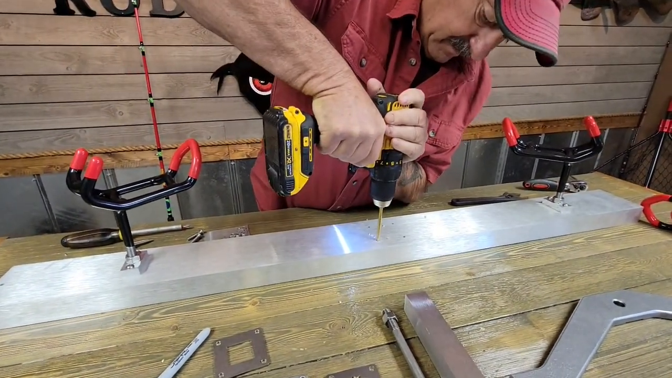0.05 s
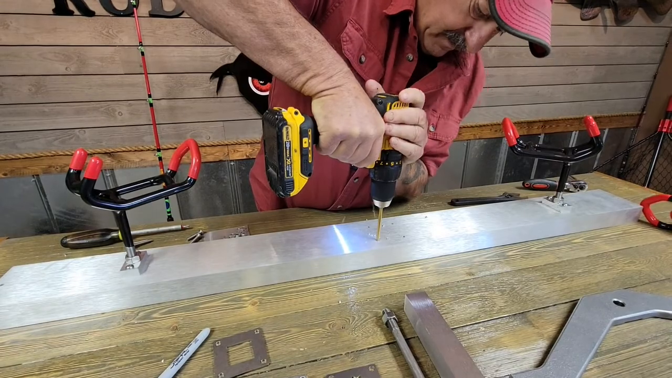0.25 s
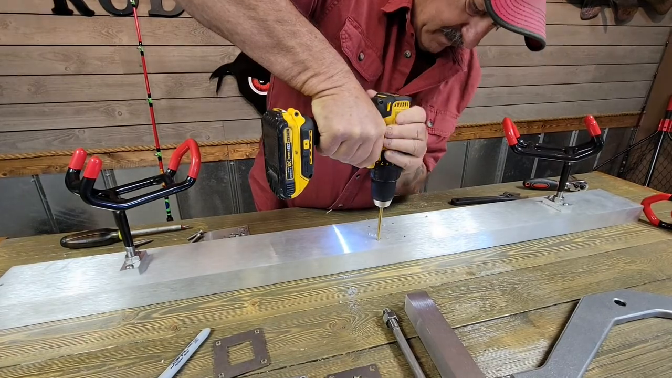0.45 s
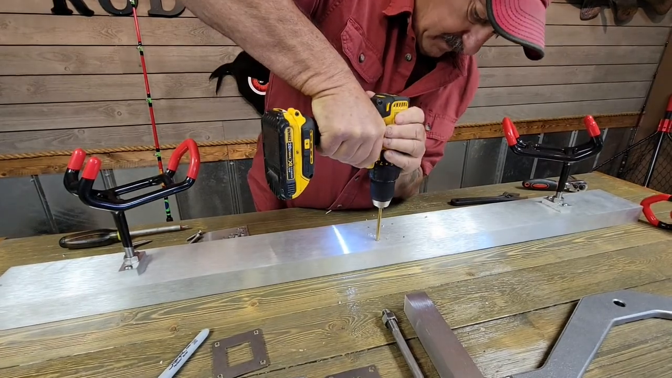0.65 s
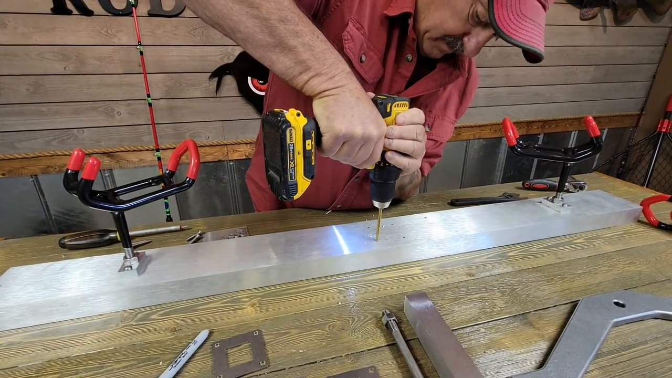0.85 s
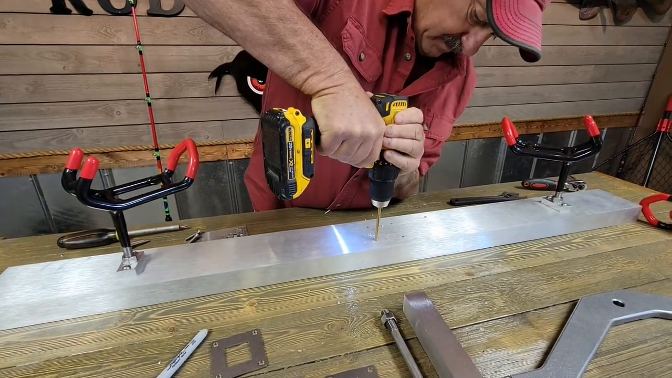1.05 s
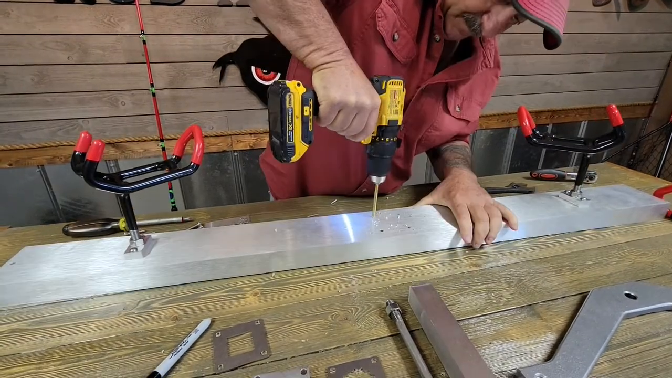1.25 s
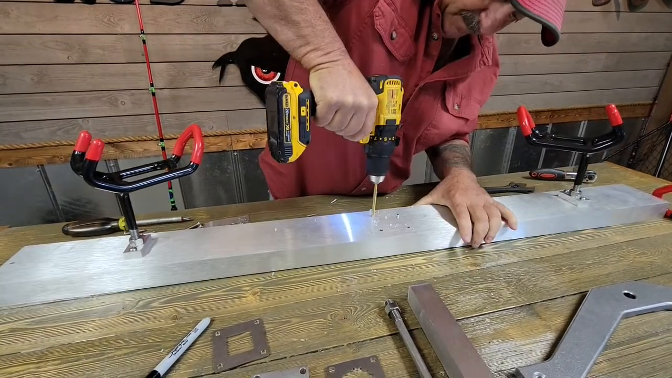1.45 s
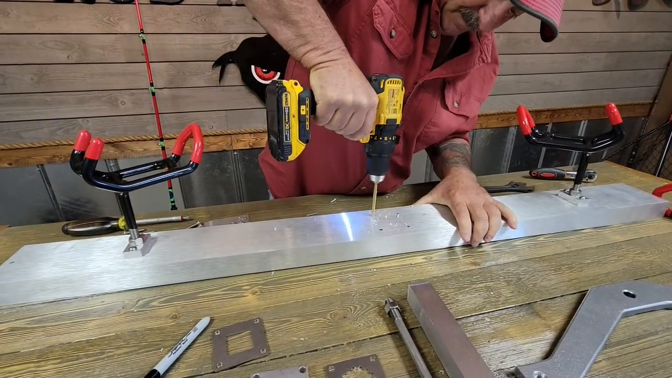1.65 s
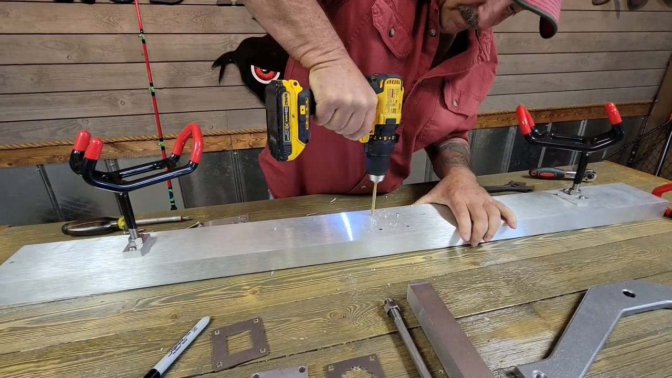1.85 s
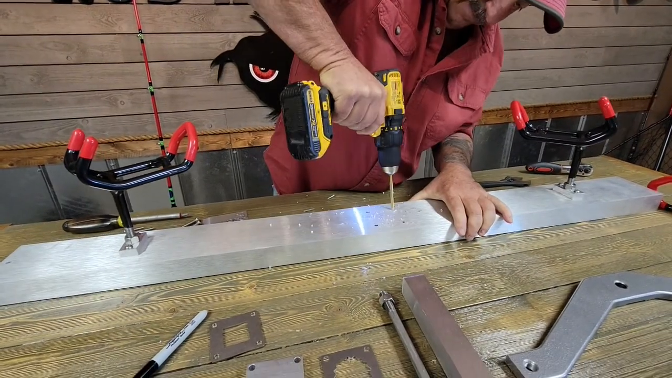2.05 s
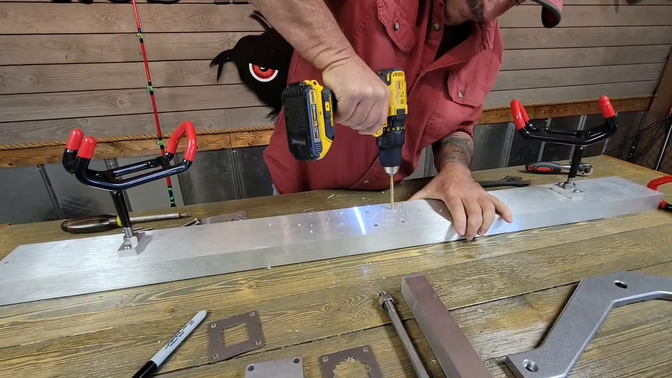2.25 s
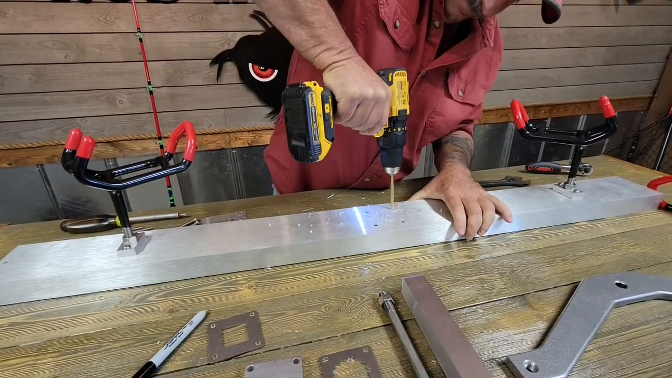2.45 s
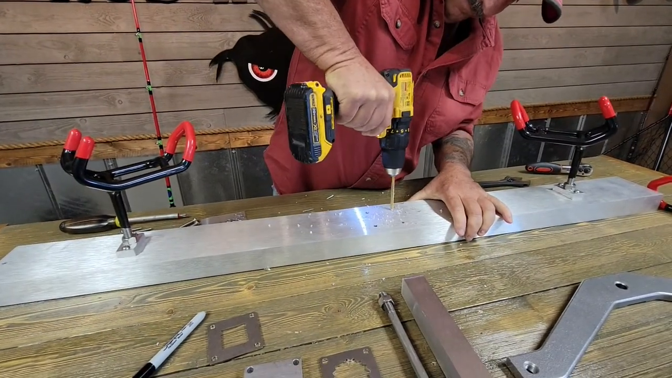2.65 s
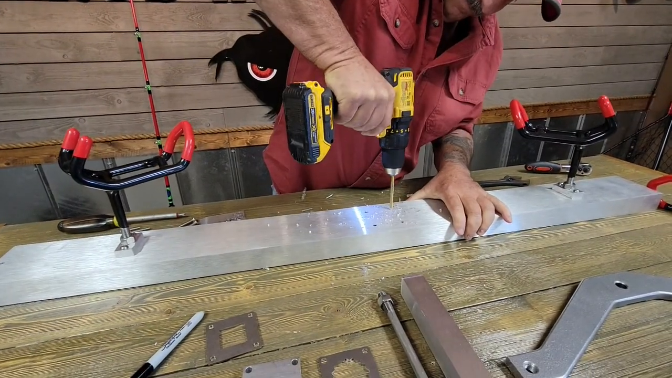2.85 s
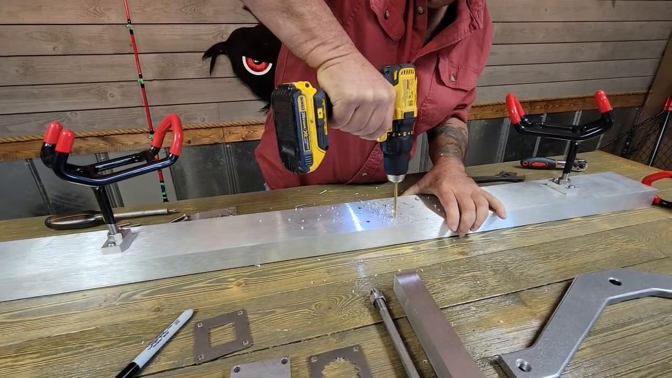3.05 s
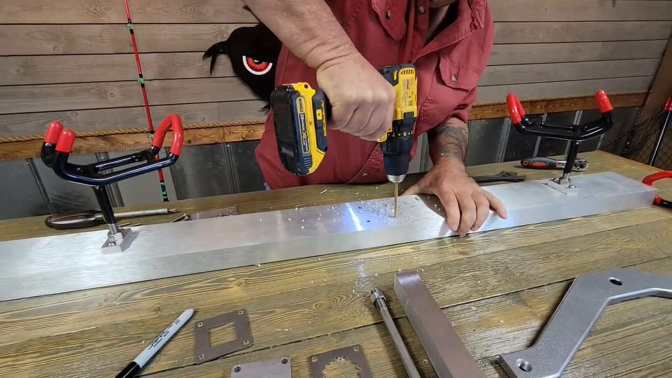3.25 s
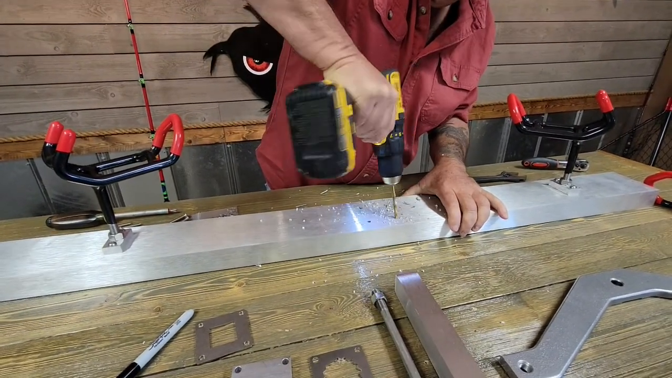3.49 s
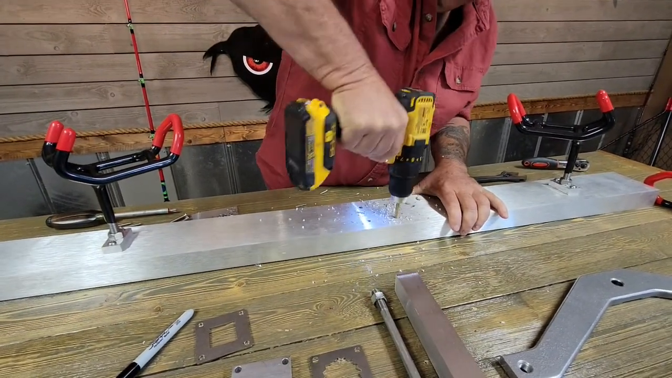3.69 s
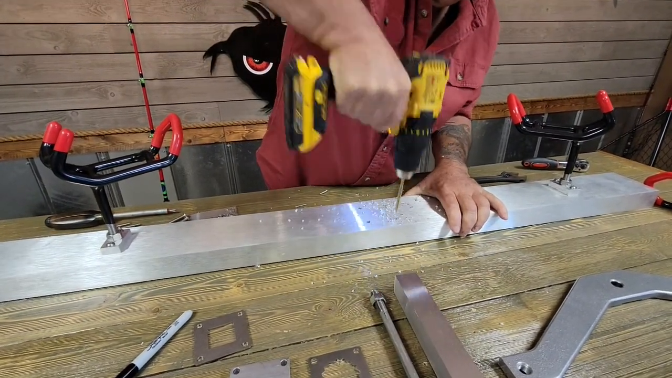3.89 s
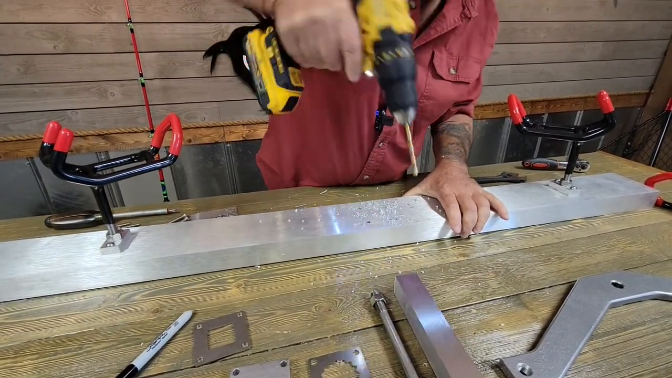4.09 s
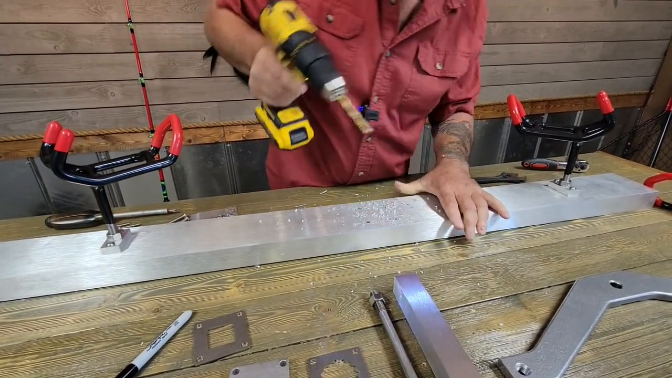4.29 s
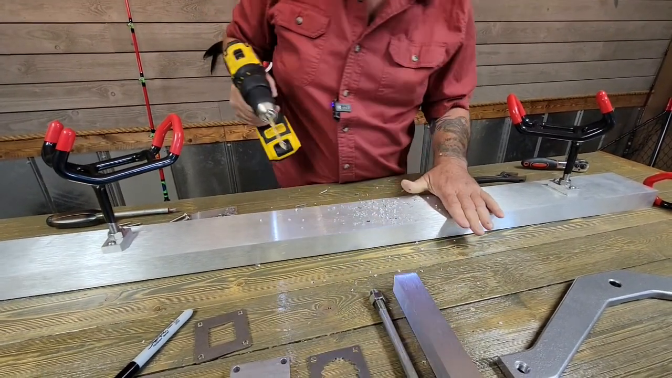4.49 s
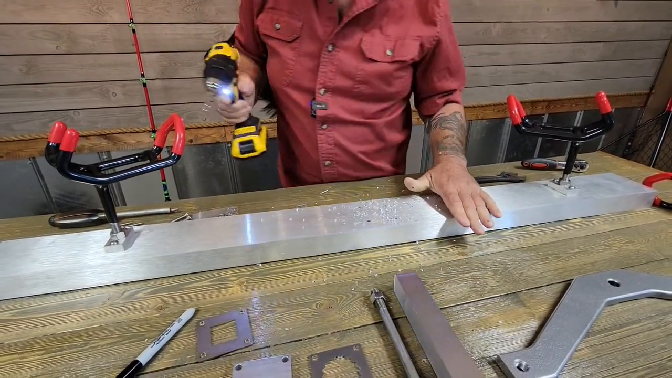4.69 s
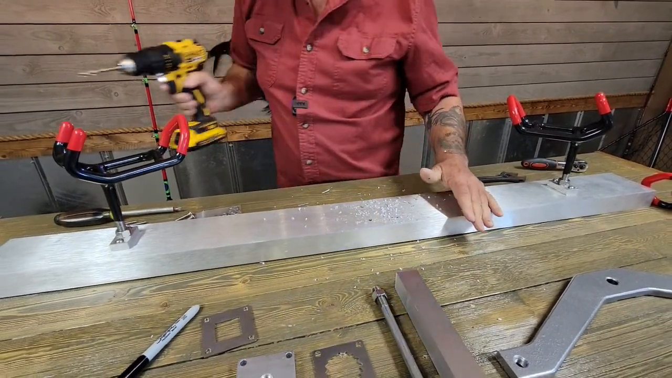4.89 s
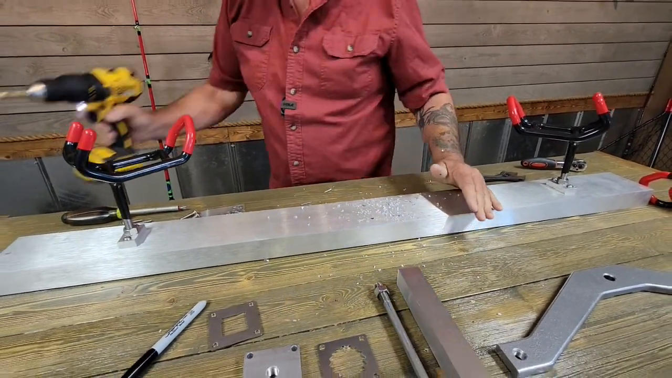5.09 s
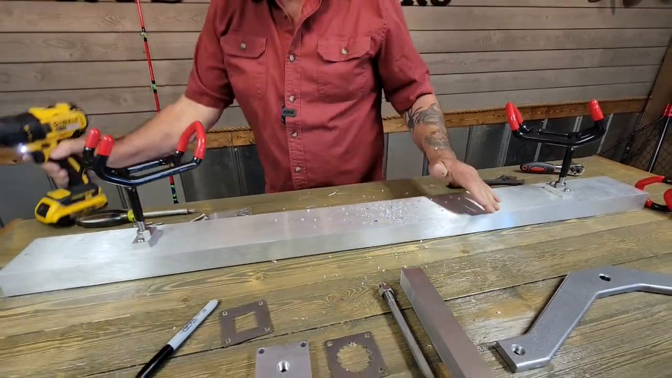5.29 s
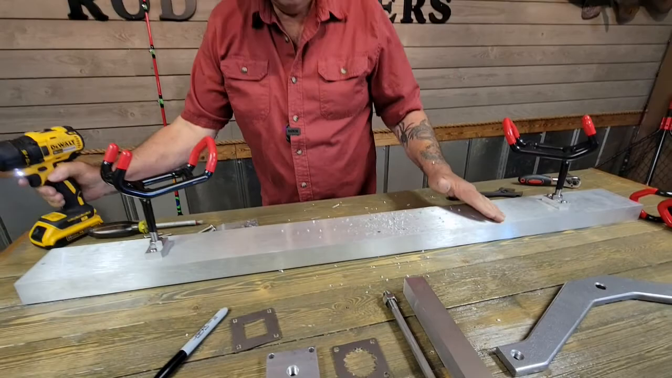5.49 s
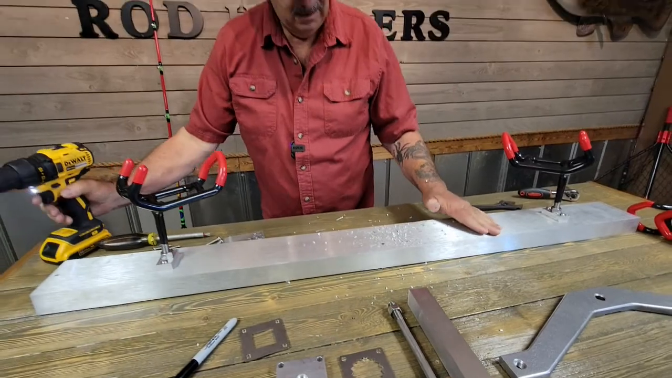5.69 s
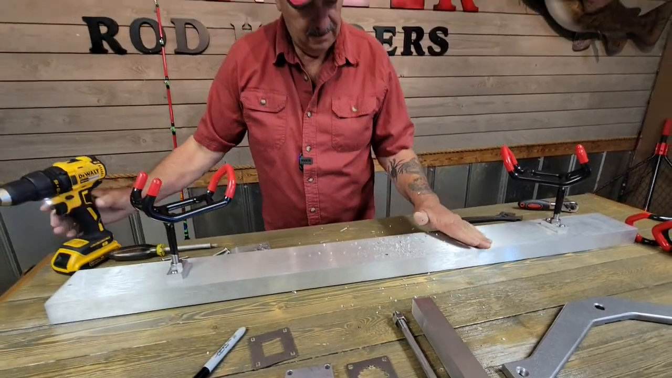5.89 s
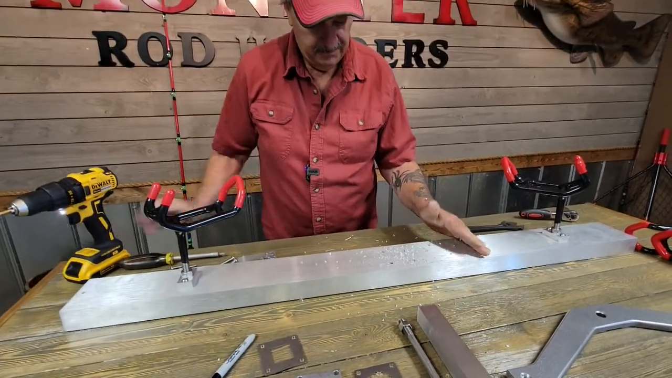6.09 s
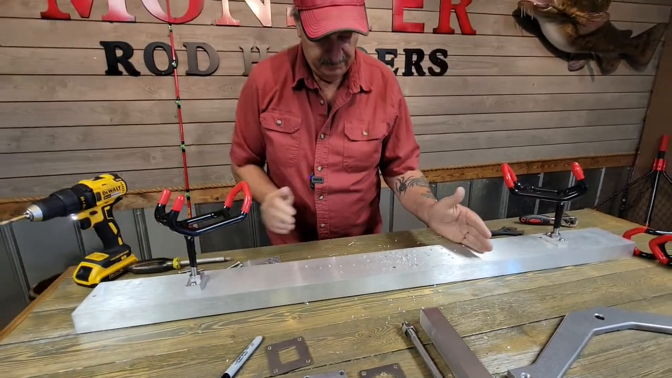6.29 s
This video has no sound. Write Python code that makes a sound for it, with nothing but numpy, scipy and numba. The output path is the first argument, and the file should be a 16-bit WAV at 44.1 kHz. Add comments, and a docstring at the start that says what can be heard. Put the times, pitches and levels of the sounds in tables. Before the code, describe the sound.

A cordless drill whines loudly through an aluminium plank, snatches, stops with a clack and is set down with a knock.

```python
"""In a shed, a cordless drill bores an aluminium plank, snatches as it breaks through and brakes; two
faint lip clicks follow, and it is set down on the bench. Magnet whine and gear tones follow the rotor;
friction makes the gears rasp and the bit squeal, and chips drive the plank's resonances. The shed
reverberates over faint air noise, and a hand slides off the drill. A clip-on microphone, bumped by a
shirt, feeds the right channel only, and its sound drops out for an instant three times."""
import sys
import numpy as np
from scipy import signal
from scipy.io import wavfile
from scipy.ndimage import uniform_filter1d, map_coordinates
from numba import njit

SR = 44100
rng = np.random.default_rng(int(sys.argv[2]) if len(sys.argv) > 2 else 0)


def unload_wav(signal):
    """Save mono or channel-first audio to the path in sys.argv[1] as 16-bit WAV at rate SR, clipped to [-1, 1]."""
    wavfile.write(
        sys.argv[1],
        SR,
        np.round(np.clip(np.atleast_2d(signal).T, -1, 1) * 32767).astype(np.int16),
    )


N = 279594
TIME = np.arange(N) / SR
BLEND_S = 0.0079  # from one stage of the work to the next

# Resonances of the gear case, the rasping gears and the fan vents: centre_hz, width_hz, gain_db
CASE_BANDS = [(1113, 470, 5.5), (1830, 340, 2), (2390, 960, -0.5)]
RASP_BANDS = [(3060, 550, -5.5), (3902, 540, 1.5), (4600, 600, 1.5), (5670, 980, 1), (6540, 1100, 0),
              (7650, 1300, 0.5)]
VENT_BANDS = [(10180, 2500, -4.5), (12270, 1100, -8.5), (13500, 1200, -6.5), (15100, 1100, -8.5)]


def undb(db):
    """Amplitude ratio of a level in decibels."""
    return 10 ** (np.asarray(db) / 20)


def unit(x):
    """Normalisation to an rms of 1."""
    return x / np.sqrt(np.mean(x ** 2))


def curves(rows):
    """Linear interpolation of each column against the first, time_s."""
    times, *columns = np.transpose(rows)
    return [np.interp(TIME, times, column) for column in columns]


def gate(start_s, end_s, edge_s):
    """Trapezoidal window: 1 between two times, with ramps outside them."""
    return np.interp(TIME, [start_s - edge_s, start_s, end_s, end_s + edge_s], [0, 1, 1, 0])


@njit
def resonator(x, hz, width_hz):
    """Second-order resonance with a moving centre and unit gain there."""
    y, band_state, low_state = np.empty(len(x)), 0., 0.
    for i in range(len(x)):
        g, damping = np.tan(np.pi * hz[i] / SR), width_hz / hz[i]
        band = (band_state + g * (x[i] + 1e-18 - low_state)) / (1 + g * (g + damping))
        band_state, low_state = 2 * band - band_state, low_state + 2 * g * band
        y[i] = damping * band
    return y


def body(x, bands):
    """Modal superposition: doubled resonators in parallel, alternating in sign."""
    out = 0
    for k, (hz, width_hz, db) in enumerate(bands):
        centre, wide = np.full(len(x), 1. * hz), 1.71 * width_hz
        out = out + (-1) ** k * undb(db) * resonator(resonator(x, centre, wide), centre, wide)
    return out


def wander(rate_hz):
    """Random modulation: held values smoothed twice, with a spread near 1."""
    hold = int(SR / rate_hz)
    steps = np.repeat(rng.standard_normal(N // hold + 1), hold)
    return 1.205 * uniform_filter1d(uniform_filter1d(steps, hold), hold)[:N]


def grit(scatter_db, flicker_db, rate_hz):
    """Amplitude-modulated noise: dense grains of uneven size whose level flickers."""
    return rng.standard_normal(N) * undb(scatter_db * rng.exponential(size=N) + flicker_db * wander(rate_hz))


def tones(phase, orders):
    """Rotational orders: sines locked to multiples of the whine, wavering in level and phase."""
    return sum(undb(db + 1.6 * wander(25)) * np.sin(k * phase + 0.73 * wander(20)) for k, db in orders)


def stage_gains():
    """Grip and load set each source's amplitude, stage by stage."""
    # Bite, shallow cut, deep cut, nearly through, snatch, through, lift, flutes dragging, running free:
    # start_s, then one level_db for each of the names below
    stages = [(0, -34.5, -29.5, -31.5, -30.5, -33.5, -33.5, -25, -27, -21, -27, -32, -32.5, -32.5),
              (1.16, -41.5, -39.5, -31.5, -44.5, -38.5, -35.5, -28.5, -27.5, -21.5, -25.5, -22, -18, -32),
              (2.055, -34.5, -31, -33.5, -42, -35.5, -35.5, -26.5, -26, -21, -24, -31, -21.5, -31),
              (2.96, -29.5, -39, -30, -46, -36, -38, -28.5, -26, -21.5, -28, -29.5, -23, -30.5),
              (3.43, -32.5, -40.5, -40, -38, -37, -46.5, -27, -25.5, -24, -27.5, -32.5, -37, -34),
              (3.61, -36, -41.5, -42.5, -46, -25, -38, -19.5, -29.5, -24.5, -24.5, -28, -32.5, -32),
              (3.69, -41.5, -40.5, -42.5, -43, -37, -41, -24.5, -34, -20.5, -32.5, -33, -31.5, -35.5),
              (3.72, -38.5, -40, -43.5, -39.5, -24.5, -39, -16, -27.5, -24, -29, -40.5, -42, -35.5),
              (3.92, -36.5, -45.5, -44.5, -41.5, -35, -37.5, -35, -26.5, -30, -33.5, -43, -44.5, -38.5)]
    names = "slow sun ring beat boom shaft chatter growl rasp steady moving teeth fan".split()
    # Easing as a stage goes on: boom_db_per_s, chatter_db_per_s, fan_db_per_s
    settling = -3, -3.5, -3
    slope = dict(zip(("boom", "chatter", "fan"), settling), shaft=settling[0])
    starts, *levels = np.array(stages, float).T
    now = np.searchsorted(starts, TIME, side="right") - 1
    age = TIME - starts[now]
    return {name: undb(uniform_filter1d(db[now] + slope.get(name, 0) * age, int(BLEND_S * SR)))
            for name, db in zip(names, levels)}


def magnet_whine(phase):
    """Periodic magnetic forces in the motor radiate a tone with weaker lines above it."""
    # Lines beside the whine: whine_multiple, relative_db
    sidebands = [(1.018, -10), (1.125, -15.5)]
    return np.sqrt(2) * np.sin(phase) * undb(1.2 * wander(30)) + tones(phase, sidebands)


def gear_tones(phase, whine_hz, gain):
    """Teeth meet periodically, giving mesh tones; their rattle grows as load drags the speed down."""
    # Output gears, then fine teeth: whine_multiple, relative_db
    output_gears = [(.191, -15), (.234, -8.5), (.312, 1), (.345, 2), (.674, -1), (.689, -4.5)]
    fine_teeth = [(3.205, -16), (3.273, -14), (3.307, -15), (3.34, -14)]
    # Sun mesh, ring mesh and doubled tooth beat: whine_multiple, relative_rattle_db
    meshes = [(1.568, -12), (1.69, -3), (2.0, 2)]
    # Gear lines that flare as the bit catches: peak_s, length_s, whine_multiple, level_db
    flares = [(3.44, 0.022, 1.568, -22), (3.48, 0.023, 1.69, -22), (3.528, 0.037, 1.69, -22),
              (3.56, 0.05, 1.69, -28.5), (3.64, 0.017, .674, -22.5), (3.66, 0.042, 1.568, -22.5),
              (3.7, 0.042, 1.568, -27.5), (3.783, 0.022, .9, -23), (3.45, .03, 3.0, -27.5),
              (3.52, .02, 2.6, -30), (3.557, .05, 3.3, -26), (3.871, .02, 1.75, -24)]
    load = np.clip(3000 / whine_hz - .3, .5, 1.5)

    def rattle(multiple):
        """Tooth chatter spreads a narrow band of noise around a mesh line."""
        flicker = undb(3.0 * wander(70))
        return load * flicker * unit(resonator(rng.standard_normal(N), multiple * whine_hz, 130.))

    out = gain["slow"] * tones(phase, output_gears) + gain["teeth"] * tones(phase, fine_teeth)
    for (multiple, rattle_db), name in zip(meshes, ("sun", "ring", "beat")):
        out += gain[name] * (tones(phase, [(multiple, 0)]) + undb(rattle_db) * rattle(multiple))
    for peak_s, length_s, multiple, db in flares:
        swell = undb(db) * np.exp(-(2 * (TIME - peak_s) / length_s) ** 2)
        out += swell * (tones(phase, [(multiple, -6)]) + 0.98 * rattle(multiple))
    return out


def gear_and_fan_noise(pulsing, gain):
    """Noise from gears and fan, modulated by the rotation, is coloured by fixed resonances."""
    rasp = gain["rasp"] * unit(body(pulsing * grit(1.5, .7, 30), RASP_BANDS))
    growl = gain["growl"] * unit(body(pulsing * grit(1.5, .7, 30), CASE_BANDS))
    fan = gain["fan"] * unit(body(pulsing * grit(2.5, .8, 30), VENT_BANDS))
    return rasp + growl + fan


def bit_squeal(whine_hz, pulsing, gain):
    """Friction at the bit excites one band that follows the speed and two that stay put."""
    scrape = pulsing * grit(1.5, 1., 40)
    squeal_hz = 3.27 * whine_hz
    moving = unit(resonator(resonator(scrape, squeal_hz, 950.), squeal_hz, 950.))
    steady = unit(body(scrape, [(8550, 730, -0.5), (9520, 380, 1.4)]))
    return gain["moving"] * moving + gain["steady"] * steady


def plank_vibration(phase, gain):
    """Forced vibration: chips and turning shafts shake the plank, which at times hums on the bench."""
    # Modes of the plank on the bench, then of its walls: centre_hz, width_hz, gain_db
    boom_modes = [(68.4, 82, -7.5), (127, 28, -4), (185, 56, 0), (266, 90, -1)]
    wall_modes = [(400.3, 99, -6), (537, 44, 4), (681, 63, 3), (898, 140, 1), (1060, 600, -13.5)]
    # Shaft rotations felt in the plank: whine_multiple, relative_db
    shafts = [(.031, -11), (.049, -12), (.064, -4), (.097, -10), (.125, -2)]
    # Spells of humming: start_s, end_s, pitch_hz, level_db
    hums = [(1.17, 1.549, 134.8, -43.5), (2.2, 2.644, 127.7, -36.5), (3.73, 3.911, 166.9, -26.5)]
    chips = grit(1.5, 1.2, 35)
    boom = gain["boom"] * 0.71 * unit(body(chips, boom_modes))
    chatter = gain["chatter"] * 0.67 * unit(body(chips, wall_modes))
    out = boom + chatter + gain["shaft"] * tones(phase, shafts)
    for start_s, end_s, hz, db in hums:
        envelope = undb(db + 2.5 * wander(19)) * gate(start_s, end_s, 0.014)
        out += envelope * np.sin(2 * np.pi * hz * TIME + 0.29 * wander(15))
    return out


def drilling():
    """One rotor drives the sources, so their tones and pulsing rise and fall with its speed."""
    # Rotor speed while boring, in four runs of rows: time_s, whine_hz, level_db
    boring = [
        [(0.0, 2818, -21), (0.052, 2818, -23.5), (0.288, 2845, -18.5), (0.386, 2885, -22), (1.066, 2797, -29.5),
         (1.13, 2743, -29.5)],
        [(1.185, 2798, -24.5), (1.267, 2771, -25), (1.671, 2844, -20.5), (1.755, 2824, -23.5),
         (2.025, 2806, -22.5), (2.03, 2820, -26.5)],
        [(2.08, 2624, -27), (2.176, 2749, -20.5), (2.314, 2718, -25.5), (2.576, 2591, -27),
         (2.666, 2540, -30.5), (2.93, 2534, -29)],
        [(2.985, 2683, -26), (3.143, 2641, -26), (3.337, 2585, -26), (3.377, 2502, -24.5), (3.387, 2476, -33.5),
         (3.4, 2467, -27.5)],
    ]
    # The bit snatches, breaks through, drags and spins free: time_s, whine_hz, level_db
    breakthrough = [(3.44, 2273, -34), (3.505, 1632, -43), (3.55, 1952, -30), (3.58, 2056, -33),
                    (3.6, 2560, -26), (3.64, 2900, -21), (3.68, 2555, -30), (3.725, 2660, -30),
                    (3.78, 2802, -28), (3.87, 2976, -27), (3.935, 3073, -18), (3.98, 3103, -19.5),
                    (3.988, 3090, -21), (4.003, 2850, -27)]
    # The snatching bit shakes speed and level: start_s, end_s, speed_fraction, spread_db
    judder = 3.42, 3.72, .018, 1.5
    start_s, end_s, speed_fraction, spread_db = judder
    magnet_poles, planet_multiple = 8, .109
    whine_hz, whine_db = curves(sum(boring, []) + breakthrough)
    gain, snatch = stage_gains(), gate(start_s, end_s, BLEND_S)
    unevenness = 1 + 0.0011 * wander(60) + speed_fraction * snatch * wander(150)
    phase = 2 * np.pi * np.cumsum(whine_hz * unevenness) / SR
    # The noise swells once a rotor turn, and slightly as the planet gears pass.
    pulsing = 1 + 0.29 * np.cos(phase / magnet_poles) + 0.068 * np.cos(planet_multiple * phase)
    out = undb(whine_db) * magnet_whine(phase) + gear_tones(phase, whine_hz, gain)
    out += gear_and_fan_noise(pulsing, gain) + bit_squeal(whine_hz, pulsing, gain)
    out += plank_vibration(phase, gain)
    return gate(-1, 3.998, 0.0058) * undb(spread_db * snatch * wander(60)) * out


def shed_reverberation(x):
    """Reflections decay exponentially by band; the paths change as the worker moves, blurring tones."""
    # Decay of the shed: centre_hz, t60_s, gain_db
    decays = [(202, 0.65, 11), (534, 0.74, -0.5), (1500, .7, 2.5), (3900, .6, 2), (9250, 0.3, 0)]
    reverb_db, sway_s = -18, .0015
    tail = sum(1000. ** (-TIME / t60) * body(rng.standard_normal(N), [(hz, hz, db)])
               for hz, t60, db in decays)
    tail *= np.clip((TIME - .006) / 0.036, 0, 1)  # reflections build up
    tail = tail[:SR] / np.sqrt(np.sum(tail ** 2))
    swaying = map_coordinates(x, [np.arange(N) + sway_s * SR * wander(40)], order=3)
    return undb(reverb_db) * signal.fftconvolve(swaying, tail)[:N]


def background_air():
    """Ambient noise, broadband and strongest in the bass, swells a little near the end."""
    # Spectrum of the background: centre_hz, width_hz, gain_db
    bands = [(62, 60, -10), (118.8, 18, -2.5), (201, 120, -7.5), (400, 320, -13), (875, 900, -11.5),
             (2000, 1900, -18), (4440, 3000, -22)]
    # Its swell: time_s, level_db
    swell = [(0, -69), (4.55, -70), (4.72, -72), (5.0, -66), (6.34, -65)]
    return undb(curves(swell)[0]) * unit(body(grit(1.5, 1.3, 9), bands))


def shirt_bumps():
    """Contact noise: each bump of the shirt gives the microphone about one cycle of a low tone."""
    # Bumps: start_s, level_db, pitch_hz
    bumps = [(.31, -29.5, 85), (.55, -29, 109), (.61, -25, 99), (0.794, -24, 125), (.878, -23.5, 99),
             (4.605, -43, 74.2), (5.019, -56, 94), (6.099, -52, 105), (6.143, -59, 72.4), (6.294, -52, 83)]
    out = np.zeros(N)
    for start_s, db, hz in bumps:
        cycles = hz * (TIME - start_s)
        out += undb(db) * np.sin(2 * np.pi * cycles) * np.exp(-((cycles - 1) / 0.58) ** 2)
    return out


def brake():
    """Deceleration gives a fading rattle and a falling chirp; backlash slams the teeth to and fro."""
    # Last turns of the gears: start_s, end_s, start_hz, end_hz, level_db
    spin_down = 4.04, 4.075, 1250, 850, -25
    # Impacts across the gear play: start_s, clunk_db, crack_db
    clacks = [(3.995, -31, -15.5), (4.031, -28, -17), (4.043, -14, -14), (4.074, -9, -12.5),
              (4.077, -73, -22), (4.091, -29, -10.5)]
    brake_s, rattle_db, fade_db_per_s = 4.005, -25, -72
    rattle = grit(2.2, 1.2, 50)
    case = unit(body(rattle, CASE_BANDS)) + 0.92 * unit(body(rattle, RASP_BANDS))
    case += 0.4 * unit(body(rattle, VENT_BANDS))
    braking_s = np.clip(TIME - brake_s, 0, 1)
    out = gate(brake_s, 4.1, 0.0063) * undb(rattle_db + fade_db_per_s * braking_s) * case
    start_s, end_s, start_hz, end_hz, db = spin_down
    chirp_hz = np.interp(TIME, [start_s, end_s], [start_hz, end_hz])
    out += gate(start_s, end_s, .006) * undb(db) * np.sin(2 * np.pi * np.cumsum(chirp_hz) / SR)
    age = np.arange(int(.03 * SR)) / SR
    for start_s, clunk_db, crack_db in clacks:
        clunk = np.sin(2 * np.pi * 1080 * age) * np.exp(-age / 0.00043)
        crack = unit(body(rng.standard_normal(len(age)), [(4100, 3100, 0)])) * np.exp(-age / 0.0017)
        out[int(start_s * SR):][:len(age)] += undb(clunk_db) * clunk + undb(crack_db) * crack
    return out


def clicks_and_knocks():
    """Damped transients: faint lip clicks, then the drill knocks on the bench and loose parts shake."""
    # A tick, two lip clicks (4.756 and 4.775 s), then the battery pack landing and rocking:
    # start_s, thud_db, crack_db, contact_ms, tilt_db_per_octave
    events = [(4.427, -59, -43, 1.74, -7), (4.756, -66, -55, 1.33, -2), (4.775, -71, -51, 1.5, -6),
              (5.355, -12, -25, 2.8, 2.6), (5.512, -27, -62, 7.6, -7), (5.563, -30.5, -54, 6.3, 1.5),
              (5.634, -48, -58, 1.3, 2), (6.048, -50, -62, 8.4, -4.5)]
    # Bench modes, which colour every thud:
    # centre_hz, width_hz, gain_db, thud_t60_s, relative_shake_db, shake_t60_s
    modes = [(90, 74, -20.5, 0.088, -9.5, 0.39), (223.6, 240, -12, 0.03, -0.5, 0.51),
             (408, 150, -5, 0.042, -8, 0.44), (605.2, 223, -2, 0.065, -11.5, 0.52),
             (831, 156, 3.5, 0.051, -16.5, 0.44), (1190, 290, -7.5, 0.032, -17, 0.35),
             (1600, 490, -12, 0.021, -13.5, 0.37), (2320, 430, -10.5, 0.039, -29, 0.23),
             (3380, 1200, -39, 0.015, -21.5, 0.31)]
    out, age = np.zeros(N + SR), np.arange(SR) / SR
    for start_s, thud_db, crack_db, contact_ms, tilt_db in events:
        noise, thud = rng.standard_normal(SR), 0
        for hz, width_hz, db, t60, shake_db, shake_t60 in modes:
            decay = 1000. ** (-age / t60) + undb(shake_db) * 1000. ** (-age / shake_t60)
            thud += undb(db + tilt_db * np.log2(hz / 500)) * unit(body(noise, [(hz, width_hz, 0)])) * decay
        dull = body(noise, [(2950, 4700, 0)])
        crack = unit(body(dull, [(2920, 4600, 0)])) * np.exp(-age / 0.0035)
        crack += undb(-18) * unit(body(noise, [(9000, 6000, 0)])) * np.exp(-age / 0.0024)
        rise = np.clip(1000 * age / contact_ms, 0, 1)
        out[int(start_s * SR):][:SR] += rise * (undb(thud_db) * thud + undb(crack_db) * crack)
    return out[:N]


def hand_slide():
    """Sliding friction rustles as the hand leaves the drill."""
    # Strokes of the hand: peak_s, rise_s, fall_s, level_db
    strokes = [(5.87, .1, 0.059, -59), (6.067, 0.016, 0.028, -56.5), (6.33, 0.048, 0.045, -64)]
    # Spectrum of the rustle: centre_hz, width_hz, gain_db
    bands = [(608, 550, 5), (1800, 1200, -1), (2980, 1300, 2.5), (4260, 114, 7), (5000, 156, 6),
             (6500, 2400, -4.5)]
    envelope = sum(undb(db) * np.exp(-np.maximum((peak_s - TIME) / rise_s, (TIME - peak_s) / fall_s))
                   for peak_s, rise_s, fall_s, db in strokes)
    return gate(5.76, 7, 0.045) * envelope * unit(body(grit(2.1, 2.2, 30), bands))


def scene():
    """Direct sound, reverberation and small noises superpose at the one microphone."""
    direct = drilling() + brake() + clicks_and_knocks()
    heard = direct + shed_reverberation(direct) + background_air() + shirt_bumps() + hand_slide()
    return np.array([heard, heard])


def record(dry):
    """A band-limited, clipping signal path feeds the right channel and drops out; both hiss faintly."""
    # Brief losses of signal: cut_s, back_s, fade_out_ms, fade_in_ms, depth_db
    dropouts = [(1.138, 1.177, 8.3, 15, -70.5), (2.039, 2.071, 4.3, 11, -52),
                (2.939, 2.976, 1.5, 11, -40.5)]
    low_hz, top_hz, channel_gains = 55, 15740, np.array([[0], [2]])
    gain = np.ones(N)
    for cut_s, back_s, out_ms, in_ms, db in dropouts:
        corners_s = [cut_s - .001, cut_s, cut_s + out_ms / 1000, back_s - in_ms / 1000]
        fall = undb(np.interp(TIME, corners_s, [0, -20, 0.52 * db, db]))
        rise = np.clip(1 + (TIME - back_s) * 1000 / in_ms, 0, 1) ** 2
        gain *= np.maximum(fall, rise)
    passband = signal.butter(3, [low_hz, top_hz], "bandpass", fs=SR, output="sos")
    clipped = np.clip(signal.sosfilt(passband, dry) * gain * channel_gains, -1, 1)
    hiss = undb(-97) * rng.standard_normal((2, N))
    steep_lowpass = signal.ellip(12, .2, 85, top_hz, fs=SR, output="sos")
    return signal.sosfilt(steep_lowpass, clipped + hiss)


dry = scene()
out = record(dry)
unload_wav(out)
```